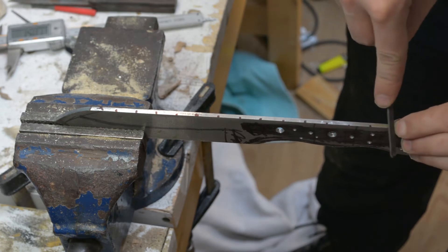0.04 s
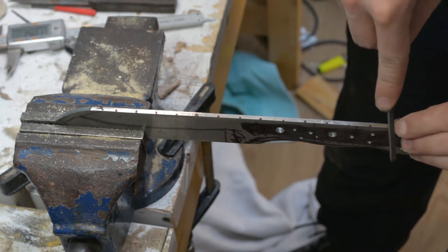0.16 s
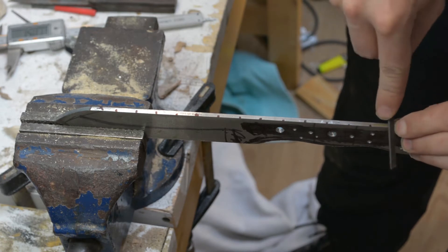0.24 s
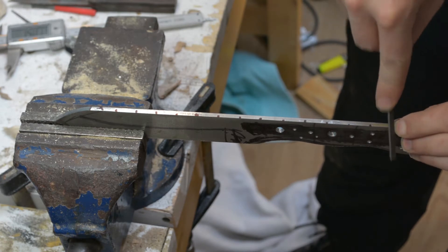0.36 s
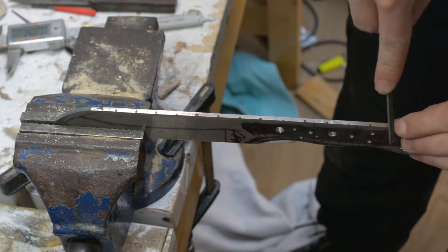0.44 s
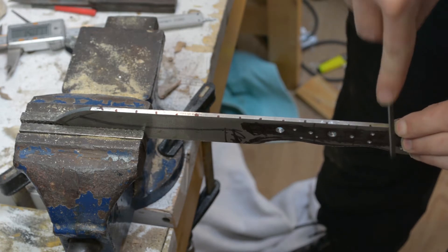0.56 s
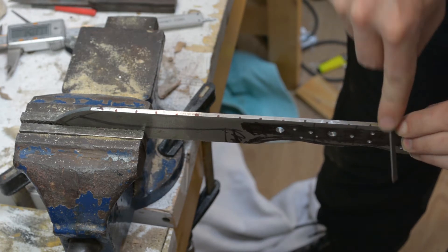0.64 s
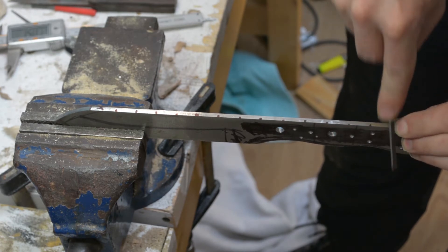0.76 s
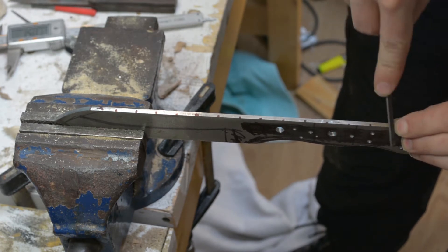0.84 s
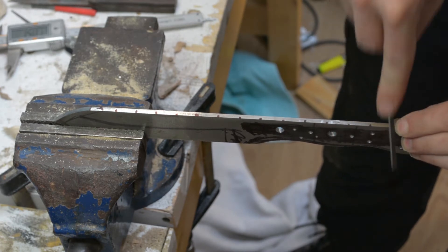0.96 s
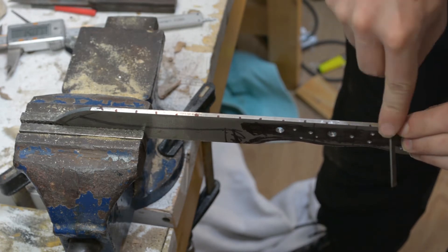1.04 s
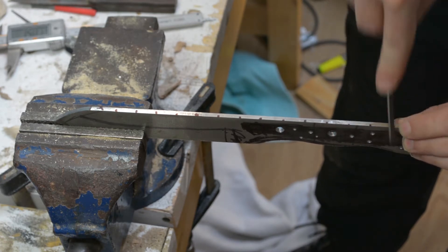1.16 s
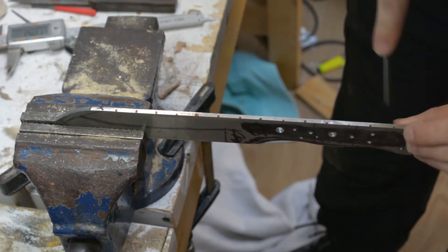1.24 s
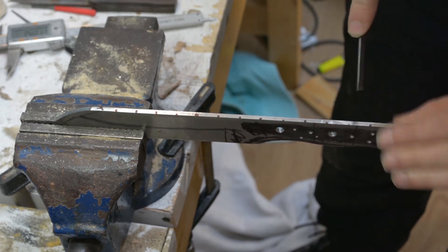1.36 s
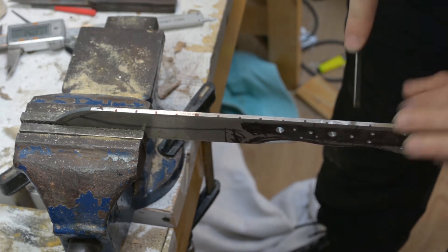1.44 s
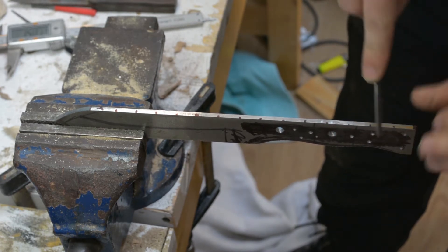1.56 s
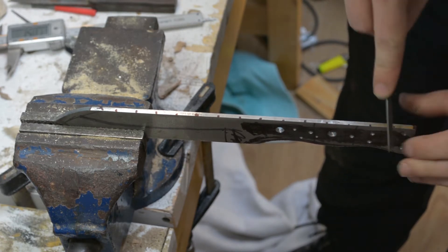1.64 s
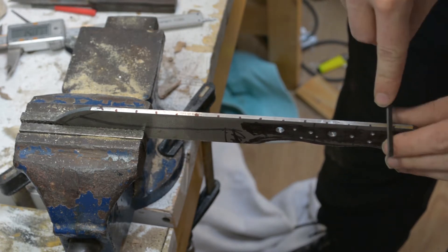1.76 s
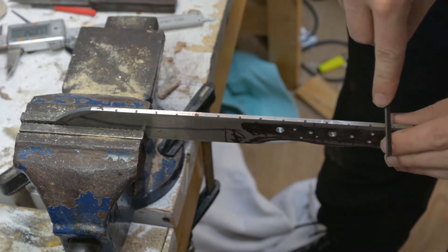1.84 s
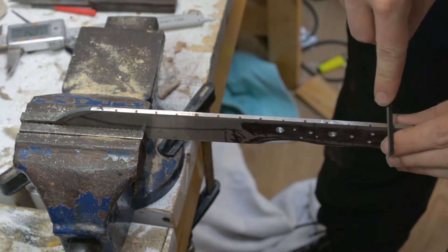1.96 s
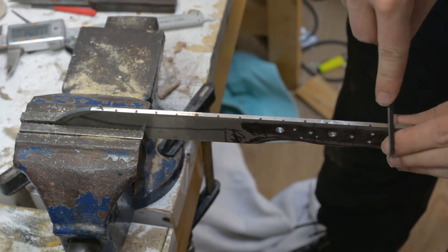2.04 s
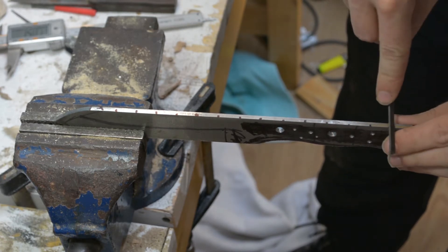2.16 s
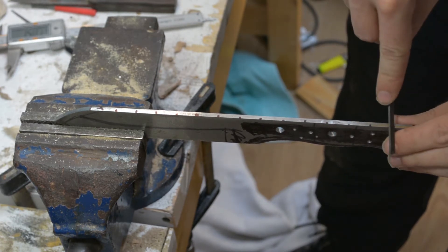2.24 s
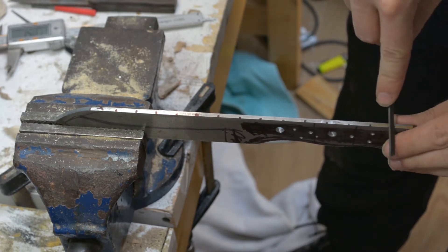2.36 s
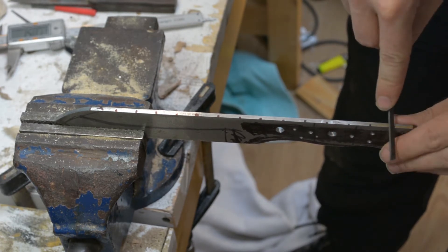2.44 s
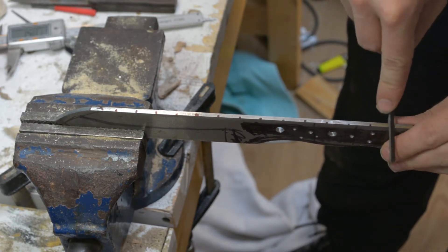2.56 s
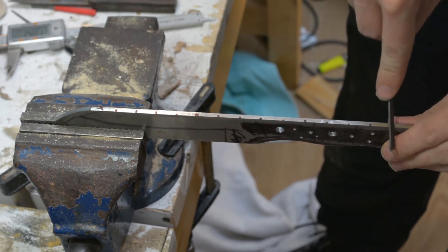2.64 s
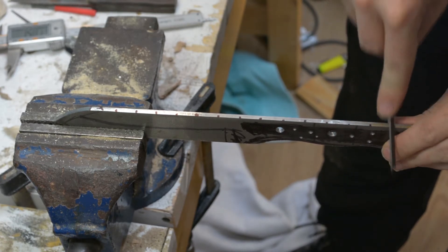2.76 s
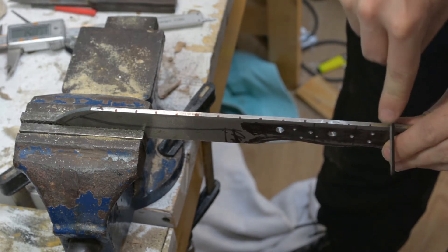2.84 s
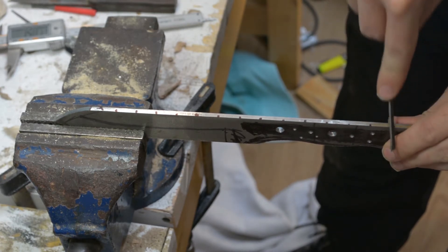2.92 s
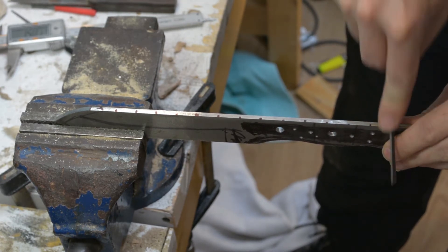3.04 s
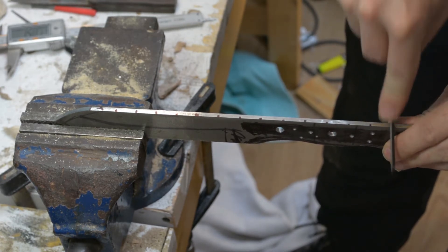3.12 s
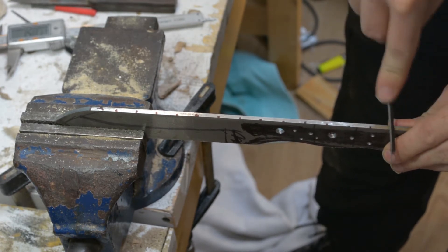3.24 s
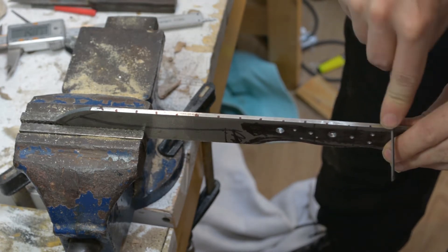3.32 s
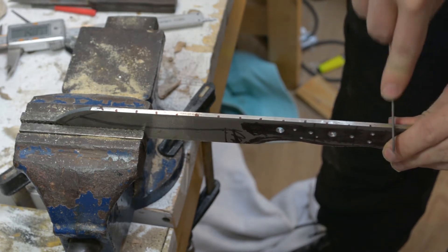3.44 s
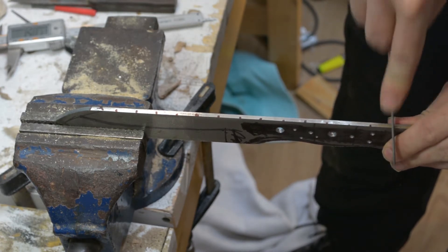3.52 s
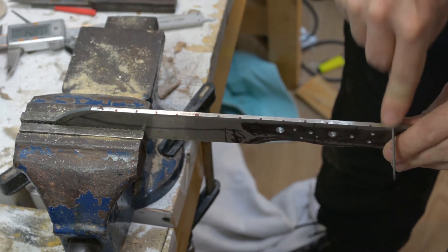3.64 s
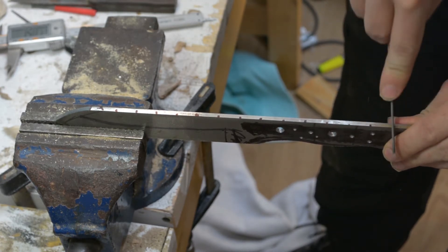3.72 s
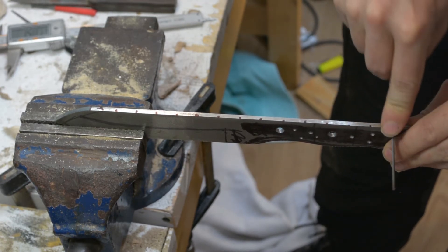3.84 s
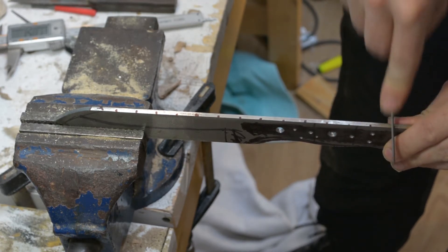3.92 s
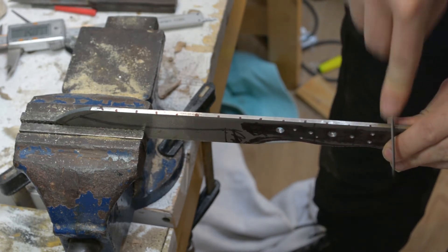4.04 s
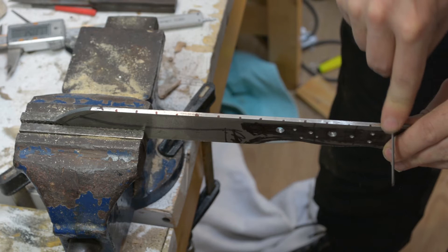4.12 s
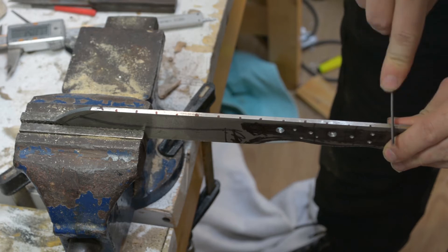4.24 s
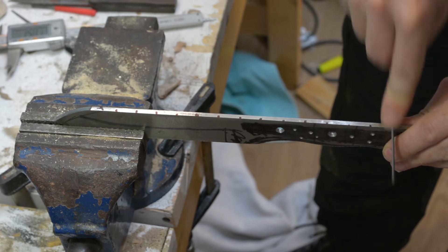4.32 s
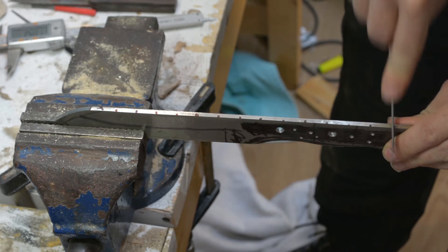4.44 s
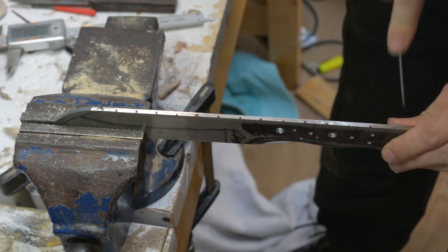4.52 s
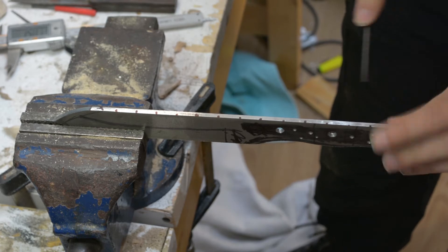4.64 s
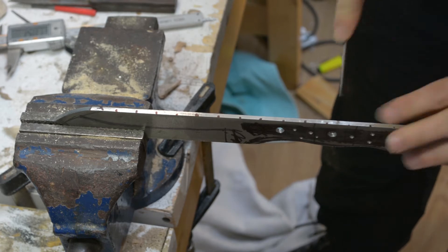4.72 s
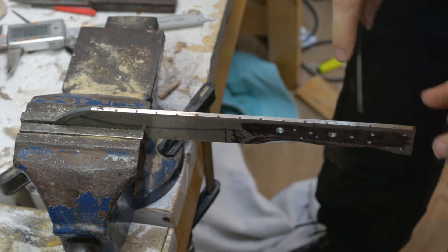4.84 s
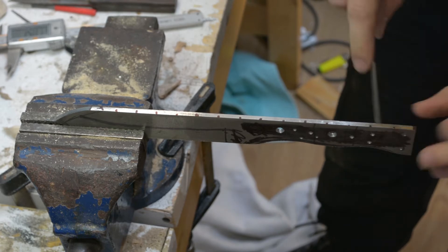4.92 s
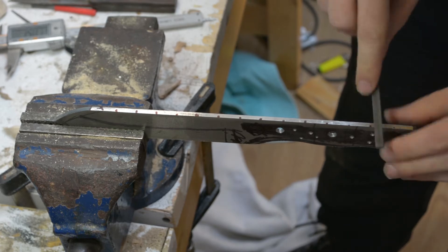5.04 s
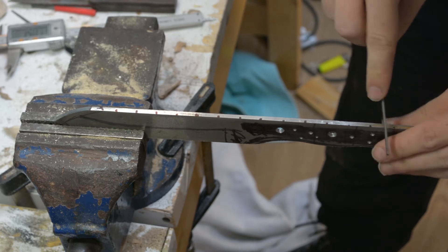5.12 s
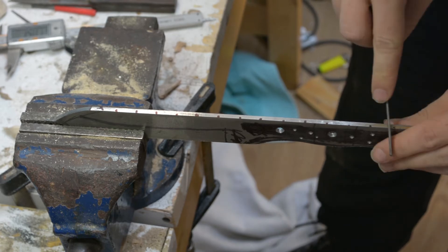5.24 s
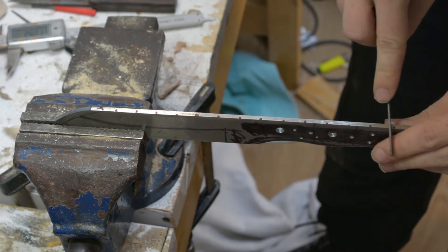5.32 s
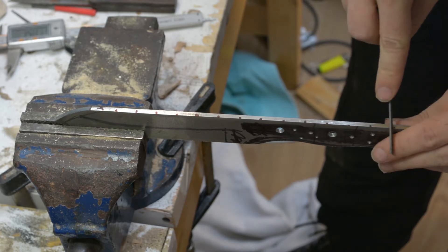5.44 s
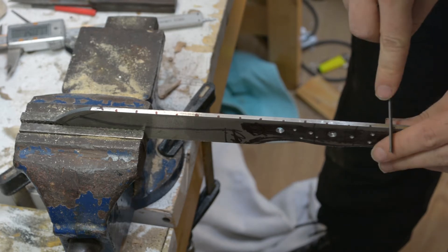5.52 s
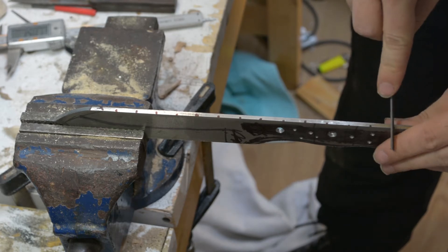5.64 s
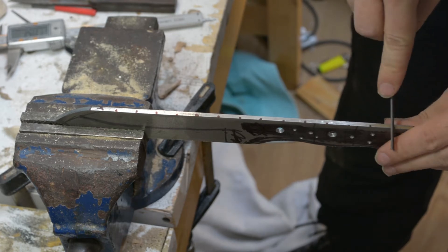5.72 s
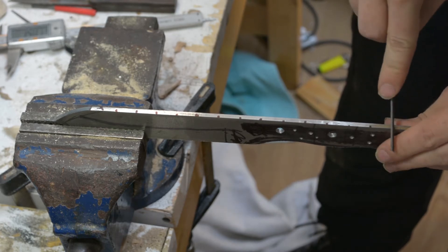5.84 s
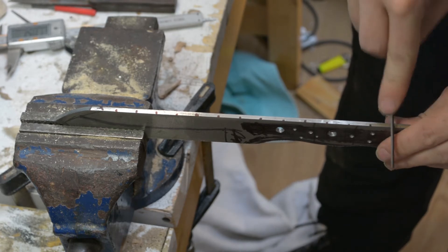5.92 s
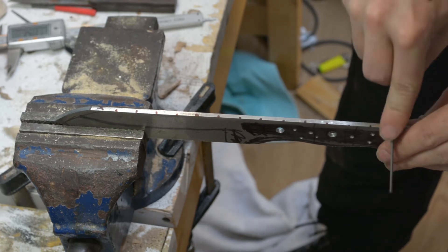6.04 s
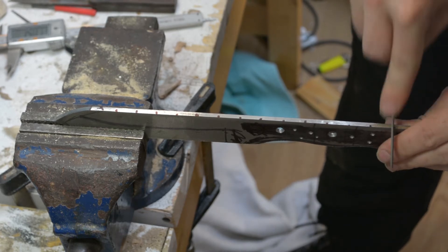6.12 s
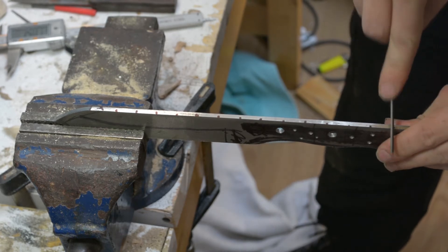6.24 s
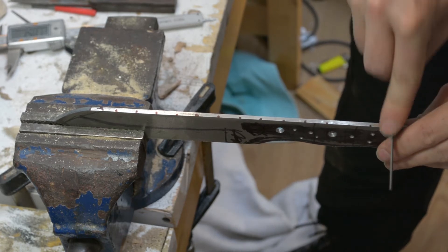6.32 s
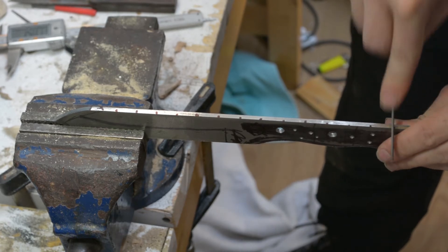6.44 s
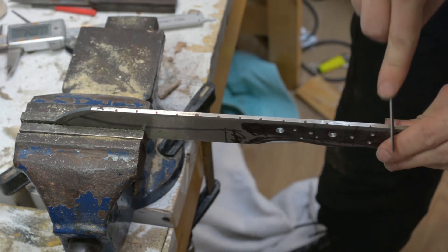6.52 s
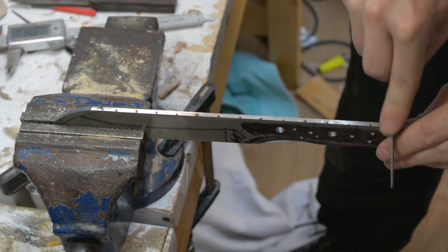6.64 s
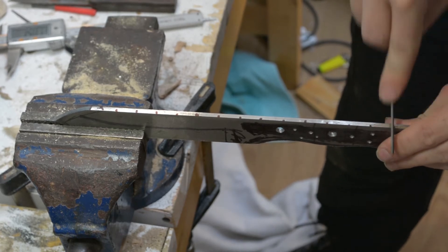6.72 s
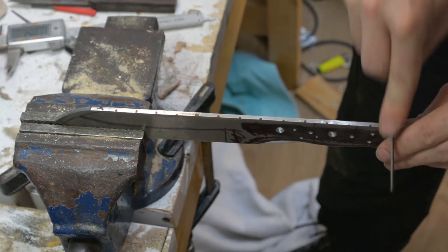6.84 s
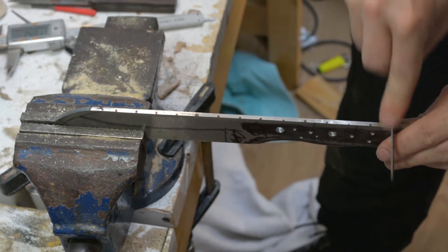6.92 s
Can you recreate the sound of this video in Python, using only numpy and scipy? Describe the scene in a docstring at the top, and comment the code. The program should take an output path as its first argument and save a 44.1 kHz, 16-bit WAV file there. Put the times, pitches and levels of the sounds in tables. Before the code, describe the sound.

A close microphone in a small, fairly dry workshop hears a needle file working the spine of a knife blade clamped in a vice, over soft room hush with barely audible electrical tones. From 0.05 s, quick push-pull strokes buzz coarsely, each pitch swooping up and down; pairs near 0.2, 0.6 and 1.0 s grow faster, brighter and grittier. At about 1.2 s the file comes free with a bright scrape and short steel ring, with small ticks and a faint rub near 1.5 s. Quiet until 2.3 s, when light strokes begin, quickly strengthening into continuous rapid rasping from 2.75 s, strongest around 3.0-3.3 s, then lighter, ending in a thin hissy scrape and clink at 4.5 s. Faint handling rubs fill the pause, with a small tick near 5.65 s. At 5.9 s a forceful run starts, eight or so strokes a second, dense, buzzing and harsh until the end at 7 s.

```python
"""In a small workshop, a needle file is pushed and pulled across the spine of a knife blank held in a vice.
Each tooth that crosses the edge gives a tick, so a buzz glides up and down with the speed of every stroke.
Torn grit adds rasp and hiss, and both ticks and grit ring in the blade. There are also light rubs, and
short rings when the file or fingers catch on an edge. Room hush and thin electrical tones lie underneath."""
import sys
import numpy as np
from scipy import signal
from scipy.io import wavfile
from scipy.ndimage import uniform_filter1d

SR = 44100
rng = np.random.default_rng(int(sys.argv[2]) if len(sys.argv) > 2 else 0)


def unload_wav(signal):
    """Save mono or channel-first audio to the path in sys.argv[1] as 16-bit WAV at rate SR, clipped to [-1, 1]."""
    wavfile.write(
        sys.argv[1],
        SR,
        np.round(np.clip(np.atleast_2d(signal).T, -1, 1) * 32767).astype(np.int16),
    )


N = 307818

# File strokes, alternately push and pull: (bites from t/s, hardest at t/s, swell t/s, fade t/s,
# teeth per second at full speed f/Hz, buzz level/dB, rasp against buzz level/dB, hiss against buzz level/dB)
STROKES = [(0.052, 0.059, 0.027, 0.15, 376.4, -33.5, -7, -21),
           (0.177, 0.226, 0.148, 0.18, 320.5, -29, -3.5, -14),
           (0.294, 0.429, 0.134, 0.22, 332.3, -32.6, -2, -8.3),
           (0.565, 0.612, 0.111, 0.24, 628, -27.5, -5.5, -14),
           (0.689, 0.832, 0.141, 0.2, 721.8, -31.5, -1, -6.5),
           (0.953, 1.011, 0.177, 0.19, 737, -25.5, -3, -15),
           (1.036, 1.201, 0.166, 0.18, 983, -30.5, 1.1, -5.5),
           (2.325, 2.468, 0.143, 0.14, 439.4, -47.5, -7, -22),
           (2.468, 2.541, 0.07, 0.1, 418, -44.5, -3.5, -20),
           (2.501, 2.657, 0.155, 0.19, 319.2, -38.5, -8.5, -18),
           (2.752, 2.8, 0.194, 0.16, 499.8, -30.5, -6, -18.5),
           (2.795, 2.936, 0.14, 0.19, 568.2, -35.5, -5.5, -14.5),
           (3.01, 3.052, 0.119, 0.15, 816.7, -28, -6, -17),
           (3.053, 3.188, 0.136, 0.24, 886.7, -33.5, -3, -11),
           (3.284, 3.311, 0.096, 0.18, 535.5, -26.5, -7.5, -20.5),
           (3.345, 3.46, 0.117, 0.17, 648.7, -32.5, -1.6, -9),
           (3.459, 3.564, 0.105, 0.22, 534.8, -33, -7, -13),
           (3.584, 3.722, 0.138, 0.13, 639.6, -38.5, -1.5, -6.5),
           (3.627, 3.848, 0.22, 0.156, 744.1, -33.5, -5, -17),
           (3.787, 3.982, 0.195, 0.15, 303.6, -37.5, -2.5, -13),
           (4.002, 4.064, 0.063, 0.24, 545.3, -35.5, -3.5, -14.5),
           (4.052, 4.248, 0.197, 0.105, 915, -34, -2, -10),
           (4.161, 4.362, 0.202, 0.16, 688, -35, -4.5, -13.5), (4.321, 4.512, 0.193, 0.17, 1078, -38, 9, 3),
           (5.892, 6.028, 0.7, 0.15, 421.3, -29.5, -7.5, -20),
           (6.024, 6.168, 0.145, 0.19, 782, -27.5, 0.3, -10),
           (6.214, 6.314, 0.098, 0.21, 877, -26, -2.2, -16.5),
           (6.356, 6.475, 0.119, 0.17, 928.5, -27, -0.5, -8),
           (6.489, 6.603, 0.114, 0.19, 933, -27.5, -3.5, -17.5),
           (6.619, 6.746, 0.128, 0.14, 896, -27.5, 1.7, -10.5),
           (6.755, 6.859, 0.105, 0.2, 979, -27, 1.2, -15),
           (6.861, 7.003, 0.142, 0.074, 542.4, -28.5, 3.5, -7)]


def amp(db):
    """Turn decibels into a gain."""
    return 10 ** (np.asarray(db) / 20)


def rms_one(x):
    """Scale a sound to an average (rms) level of 1."""
    return x / np.sqrt(np.mean(x ** 2) + 1e-20)


def evened(x, window_s):
    """Divide out the running level, so the loudness stays nearly even."""
    return x / np.sqrt(uniform_filter1d(x ** 2, round(window_s * SR)) + 1e-12)


def at_hz(points, hz):
    """Read a table between its points, on a log-frequency axis."""
    points = np.array(points)
    return np.interp(np.log(hz), np.log(points[:, 0]), points[:, 1])


def filtered(x, order, hz, kind="low"):
    """Keep the part of a sound below, above or between the given frequencies."""
    return signal.sosfilt(signal.butter(order, hz, kind, fs=SR, output="sos"), x)


def resonance(x, hz, width_hz):
    """Ring at one pitch: two poles, with gain 1 at the top of the peak."""
    r = np.exp(-np.pi * width_hz / SR)
    top = np.array([1, 0, -1]) * (1 - r * r) / 2
    return signal.lfilter(top, [1, -2 * r * np.cos(2 * np.pi * hz / SR), r * r], x)


def bands(x):
    """Half-octave bands with their centres; signs alternate so that neighbours add up where they meet."""
    edges = 25 * 2 ** np.arange(0, 9.6, .5)
    for k, (low, high) in enumerate(zip(edges, edges[1:])):
        yield np.sqrt(low * high), (-1) ** k * filtered(x, 2, [low, high], "band")


def drift(per_s):
    """Slow chance with spread 1: straight lines between random points, per_s of them each second."""
    knots = rng.standard_normal(round(N / SR * 200) + 2)
    place = np.arange(N) / SR * min(per_s, 200)
    return np.sqrt(1.5) * np.interp(place, np.arange(len(knots)), knots)


def hush():
    """Steady room and preamp noise, alike left and right mostly in the bass, plus wavering electrical tones."""
    # colour of the noise: (f/Hz, relative level per Hz/dB)
    hush_colour = [(25, 6), (55, 1), (90, -8.5), (200, 0.5), (500, 3.5), (1300, 2.5), (3000, -4.5),
                   (6000, -12), (11000, -19), (15500, -28)]
    # how alike left and right are: (f/Hz, likeness from 0 to 1)
    hush_likeness = [(60, 0.91), (130, 0.82), (290, 0.71), (640, 0.28), (1500, 0.16)]
    # electrical tones: (f/Hz, middle rms level/dB)
    whine_tones = [(150, -77), (199, -77), (5545, -80), (11084, -82)]
    noise = 0
    for hz, (mid, side) in bands(rng.standard_normal((2, N))):
        alike = np.clip(at_hz(hush_likeness, hz), 0, 1)
        stereo = np.sqrt(1 + alike) * mid + np.sqrt(1 - alike) * side * [[1], [-1]]
        noise = noise + amp(at_hz(hush_colour, hz)) * stereo
    t = np.arange(N) / SR
    tones = 0
    for hz, db in whine_tones:
        tones = tones + np.sqrt(2) * amp(db + 2 * drift(18)) * np.sin(2 * np.pi * hz * t)
    return amp(-55) * rms_one(noise) + tones


def workshop(x):
    """The room answers with dying noise; a second, unrelated answer parts left from right."""
    # strength of the second answer: (f/Hz, level/dB)
    side_width = [(60, -28), (150, -52), (380, -77), (700, -21), (1300, -40.5), (2380, -20), (5980, -22),
                  (9000, -6.5), (15000, -11)]
    room_t60_s, room_db = .24, -10      # time to die by 60 dB; answer against the direct sound
    t = np.arange(round(.5 * SR)) / SR
    tails = rng.standard_normal((2, len(t))) * amp(-60 * t / room_t60_s) * (t > .003)
    tails = tails / np.sqrt(np.sum(tails ** 2, axis=1, keepdims=True))
    mid = x + amp(room_db) * signal.fftconvolve(x, tails[0])[:N]
    answer = signal.fftconvolve(x, tails[1])[:N]
    side = sum(amp(at_hz(side_width, hz)) * band for hz, band in bands(answer))
    side = side + 0.13 * filtered(mid, 1, 4000, "high")      # the treble leans a little to the left
    return mid + side * [[1], [-1]]


def grit(per_s, spread_db, low_hz):
    """Burrs and chips tear at random, a few much harder than the rest; too brief to push the bass."""
    strengths = amp(spread_db * np.minimum(rng.exponential(1, N), 5))
    sizes = strengths * rng.choice([-1, 1], N)
    tears = rms_one(sizes * (rng.random(N) < per_s / SR))
    return filtered(tears, 1, low_hz, "high")


def steel(force, modes_db, shift_db):
    """The force rings in the blade's modes (its own pitches) over the broad response of vice and bench."""
    # modes of the held blade: (f/Hz, least width f/Hz, level against the other modes/dB)
    blade_modes = [(187.2, 8.9, -2), (252.4, 37.5, -6), (325, 6.2, 0.5), (409.7, 30.7, 0), (525, 81, -15.5),
                   (650, 26, -14), (787, 60, -6.5), (841, 38, -7), (924, 32, -8.5), (1250, 10.5, -12),
                   (1539, 49, -13.5), (1600, 17, -31), (1800, 11.7, -41), (1872, 11.7, 1.5),
                   (1907, 20, -5.5), (2100, 35, 1), (2194, 32, -1.5), (2730, 172, -10), (2857, 150, -10.5),
                   (3138.7, 20, -13.5), (4200, 57, -10), (4610, 17, -19.5), (4790, 54, -15.5),
                   (5630, 45, -18.5), (7340, 140, -23), (9530, 82, -24), (10100, 94, -22)]
    # vice, bench and file between the modes: (f/Hz, response level/dB)
    body_response = [(30, -19), (60, -17), (110, -3.5), (300, 5.5), (600, -12.5), (880, 1), (1100, -34.5),
                     (1900, 4), (2800, -82), (3600, -11.5), (5000, -16), (10000, -20), (13000, -23),
                     (15500, -66)]
    out = sum(amp(at_hz(body_response, hz)) * band for hz, band in bands(force))
    for k, (hz, width_hz, db) in enumerate(blade_modes):
        wander = drift(7) + .5 * drift(35)
        grip = amp(modes_db + db + shift_db * wander)      # the moving contact finds other modes
        out = out + (-1) ** k * resonance(grip * force, hz, max(width_hz, hz / 65))
    return out


def free_ring():
    """Let go, the blade rings on in a few long modes, and a short bright rip of grit flies off."""
    # file or fingers catch on an edge or flick off it:
    # (t/s, ring level/dB, sharpness per octave above 872 Hz/dB, rip level/dB)
    let_go = [(0.207, -55.5, -8.5, -51), (0.24, -65, 8, -42), (0.407, -69.5, 15.5, -44),
              (0.565, -64, 8, -39), (1.227, -40, 1.5, -28), (1.462, -55, 4, -58), (1.478, -43, -2.5, -70),
              (1.494, -51, -2, -68), (4.46, -48, 1, -40), (4.52, -44, 6, -26), (5.643, -52.5, 8.5, -58),
              (5.892, -50, 4.5, -43)]
    # blade undamped by the hand: (f/Hz, level against the ring level/dB, time to die by 60 dB t/s)
    free_modes = [(63, -26, .8), (371, -17, .3), (872, -2, .45), (1927, -7, .17), (2210, -10, .14),
                  (4220, -19, .14), (4910, -9, .16), (5640, -12, .16)]
    s, ring_db, sharp_db, rip_db = np.transpose(let_go)
    at = np.round(s * SR).astype(int)
    rips = np.full(N, 1e-18)
    rips[at] = amp(rip_db)
    fading = signal.lfilter([1], [1, -amp(-60 / (.12 * SR))], rips)      # each rip dies by 60 dB in 0.12 s
    chips = grit(per_s=12000, spread_db=3.0, low_hz=5000)
    out = fading * rms_one(steel(chips, modes_db=1.5, shift_db=1.5))
    for hz, db, t60 in free_modes:
        flicks = np.full(N, 1e-18)
        flicks[at] = amp(ring_db + db + sharp_db * np.log2(hz / 872))
        r, w = amp(-60 / (t60 * SR)), 2 * np.pi * hz / SR
        out = out + signal.lfilter([0, np.sin(w)], [1, -2 * r * np.cos(w), r * r], flicks)
    return out


def arch(t, peak, swell, fade):
    """A quarter cosine up to the peak and another down."""
    distance = np.where(t < peak, (peak - t) / swell, (t - peak) / fade)
    return np.cos(np.pi / 2 * np.clip(distance, 0, 1)).clip(0)


def pressure():
    """Gains of buzz, rasp and hiss follow the press of the file; overlapping contacts add in power."""
    # light rubs of file or fingers, without a stroke of their own: (from t/s, hardest at t/s, swell t/s,
    # fade t/s, buzz level/dB, rasp against buzz level/dB, hiss against buzz level/dB)
    light_rubs = [(1.42, 1.466, 0.084, .12, -55.5, 3.5, -8), (4.66, 4.765, 0.26, 0.21, -57.5, -6.5, -7),
                  (5.4, 5.472, .1, .15, -60.5, 6, -8), (5.42, 5.605, 0.22, 0.24, -52, -9, -18),
                  (5.638, 5.644, .04, 0.15, -50, 8, 5)]
    # build-up after the file lands, in rows for buzz, rasp and hiss: (t/s)
    bite_s = [
        [0.004],
        [0.00085],
        [0.00052],
    ]
    laws = np.array([[4.64], [7.35], [8.6]])      # powers of the arch: hiss keeps closest to the crest
    t, power = np.arange(N) / SR, np.zeros((3, N))
    for start, peak, swell, fade, *_, buzz_db, rasp_db, hiss_db in [*STROKES, *light_rubs]:
        on = (t >= start) & (t < peak + fade)
        levels = amp(buzz_db + np.array([[0], [rasp_db], [hiss_db]]))
        bite = 1 - np.exp(-(t[on] - start) / np.array(bite_s))
        power[:, on] += (levels * bite * arch(t[on], peak, swell, fade) ** laws) ** 2
    return np.sqrt(power)


def hand_speed():
    """Teeth per second: pushes and pulls alternate, so the hand speeds up, holds, and halts as it turns."""
    lag_s, speed_power, full_speed_at = .018, 6, .7      # a little behind the pressure, level near the top
    t, velocity = np.arange(N) / SR - lag_s, np.zeros(N)
    for k, (_, peak, swell, fade, top_hz, *_) in enumerate(STROKES):
        share = np.minimum(arch(t, peak, swell, fade) ** speed_power / full_speed_at, 1)
        velocity += (-1) ** k * top_hz * share
    return np.abs(velocity)


def teeth(per_s, seated, blunt_hz):
    """One tick per tooth that crosses the edge; their rate is the pitch of the buzz."""
    shake, jitter, uneven_db = .05, .05, 1.5      # spread of speed, tooth spacing and tooth bite
    passed = np.cumsum(per_s * (1 + shake * drift(60))) / SR
    chance = rng.standard_normal((8000, 2))[:int(passed[-1])]
    marks = np.arange(len(chance)) + jitter * chance[:, 0]
    at = np.clip(np.searchsorted(passed, marks), 0, N - 1)
    ticks = np.zeros(N)
    ticks[at] = amp(uneven_db * chance[:, 1]) * (per_s[at] / 600) ** 0.19      # a faster tooth hits harder
    ticks = ticks * np.clip(1 + drift(170) / seated, .15, None)      # the file skips, biting in short runs
    ticks = filtered(ticks, 1, blunt_hz)
    return rms_one(filtered(ticks, 2, 130, "high"))      # the vice takes up the slow push


def filing():
    """Ticks and grit drive the steel, heard as buzz, rasp and hiss under the pressure of the contact."""
    rasp_hz, hiss_hz = 1143, 3390      # where rasp and hiss begin
    seated, firm_db = .6, -25.5      # steadiness at the lightest touch; buzz level where it has doubled
    dull_hz, brisk_hz, dull_share = 550, 750, .2      # buzz above dull_hz is full only from brisk_hz teeth/s
    gains, per_s = pressure(), hand_speed()
    ticks = teeth(per_s, seated * (1 + gains[0] / amp(firm_db)), blunt_hz=5400)
    force = ticks + amp(12.5) * grit(per_s=8000, spread_db=2.0, low_hz=1050)
    top = filtered(force, 2, 8500, "high")
    force = force - .7 * np.clip(1 - per_s / 500, 0, 1) * top      # slow rubbing is duller
    sound = steel(force, modes_db=10, shift_db=4)
    buzz = filtered(sound, 4, rasp_hz)
    rasp = filtered(sound, 4, [rasp_hz, hiss_hz], "band")
    hiss = filtered(sound, 4, hiss_hz, "high")
    deep = filtered(buzz, 1, dull_hz)
    buzz = buzz - (1 - np.clip(per_s / brisk_hz, dull_share, 1)) * (buzz - deep)
    sway = amp(-1) * resonance(gains[0] * rng.standard_normal(N), 63, 6.7)      # long blade sways in the vice
    return sum(gain * evened(part, 0.023) for gain, part in zip(gains, [buzz, rasp, hiss])) + sway


def scene():
    """Filing and ringing in the room, over the hush."""
    return workshop(filing() + free_ring()) + hush()


def record(dry):
    """The microphone drops the deep bass; the top is cut above 15.7 kHz."""
    dry = filtered(dry, 2, 52.6, "high")
    return signal.sosfilt(signal.ellip(10, .5, 70, 15700, fs=SR, output="sos"), dry)


dry = scene()
out = record(dry)
unload_wav(out)
```